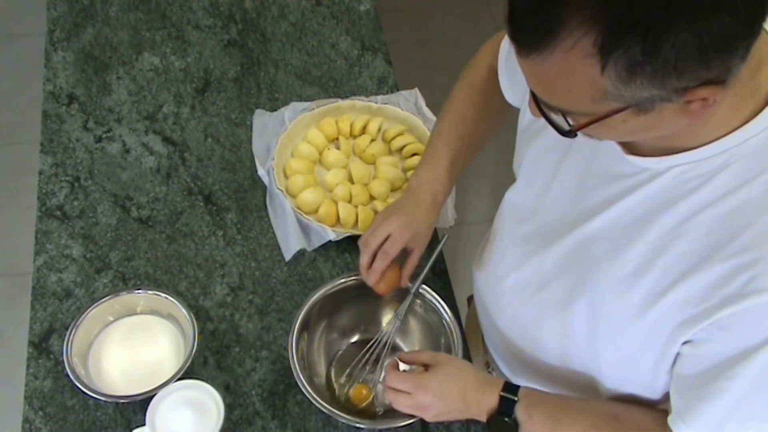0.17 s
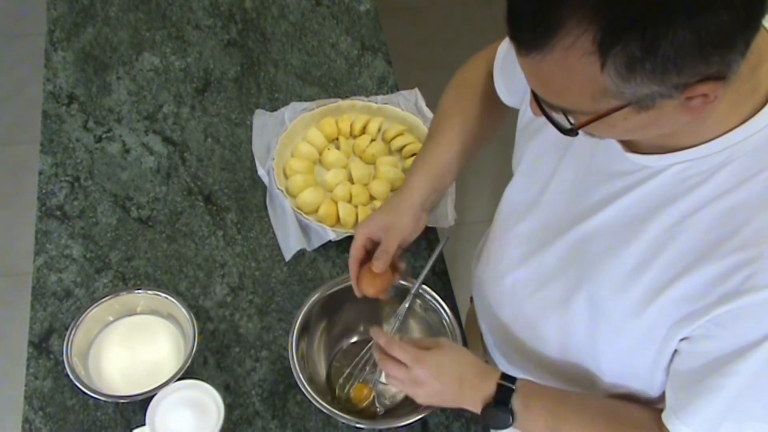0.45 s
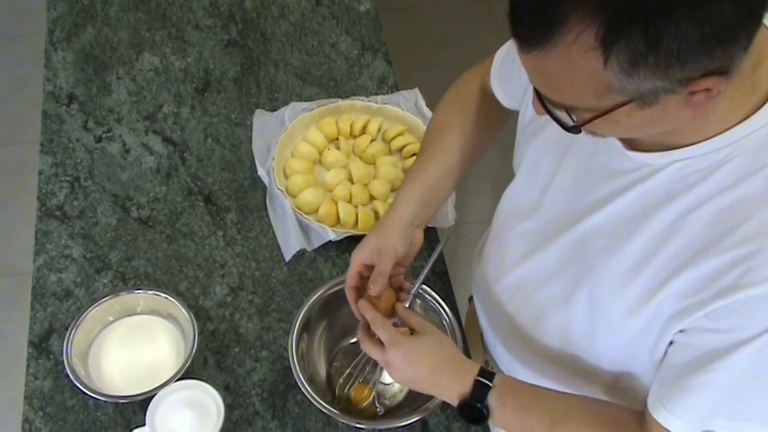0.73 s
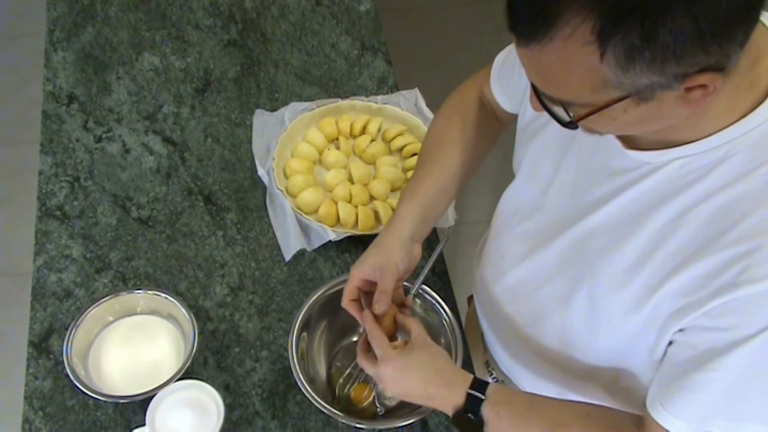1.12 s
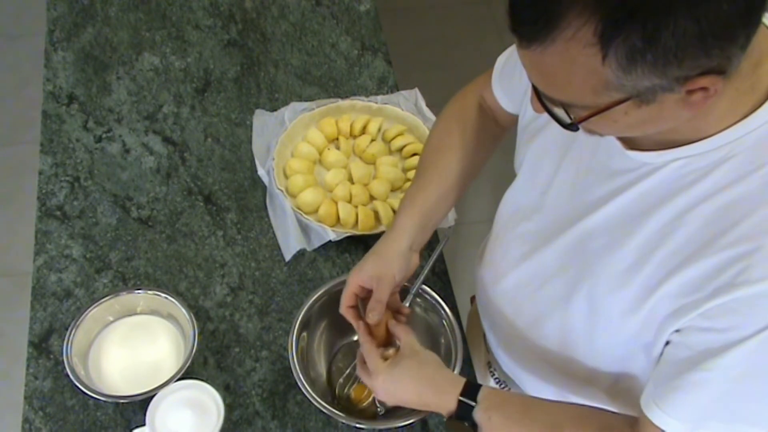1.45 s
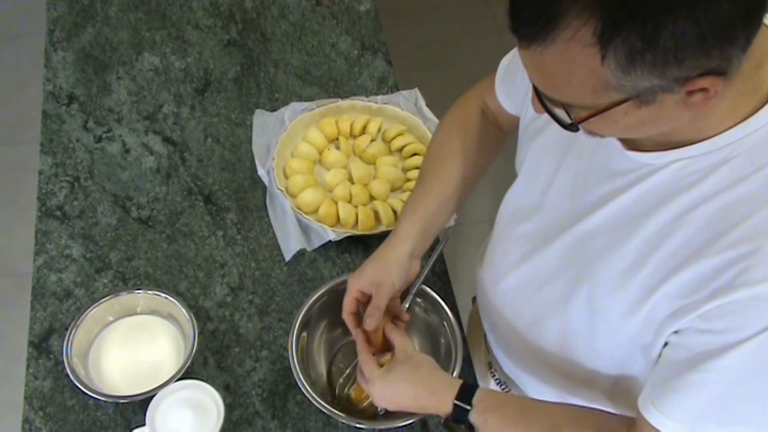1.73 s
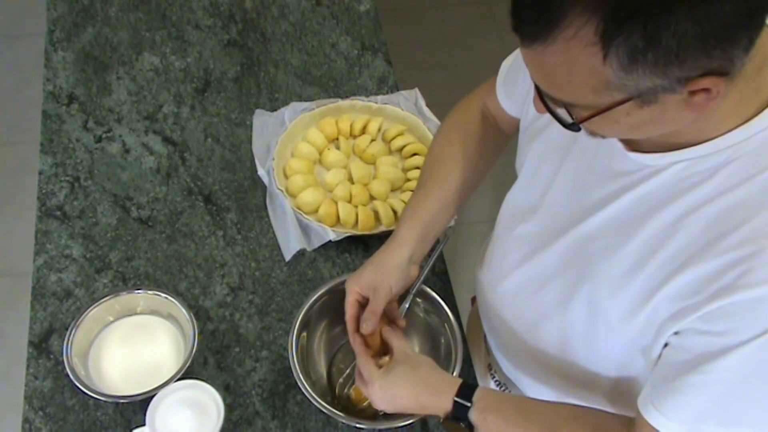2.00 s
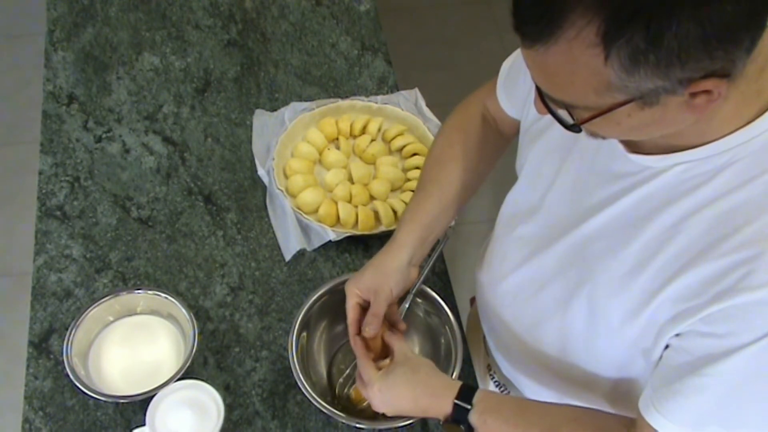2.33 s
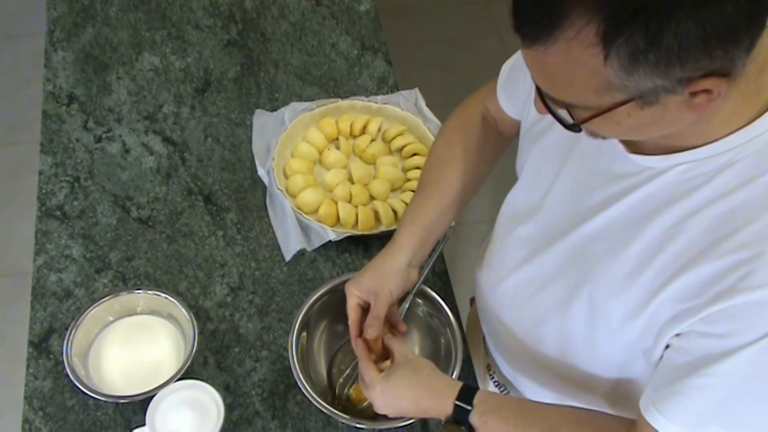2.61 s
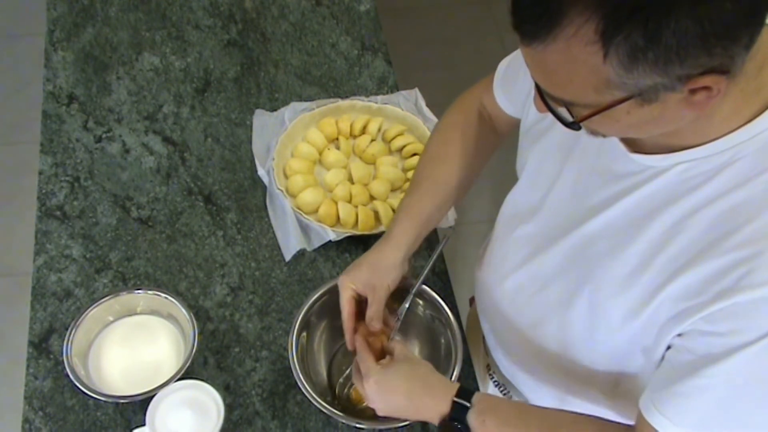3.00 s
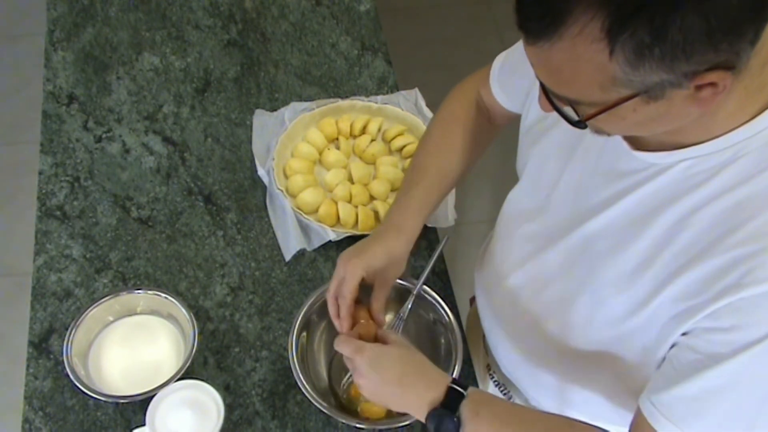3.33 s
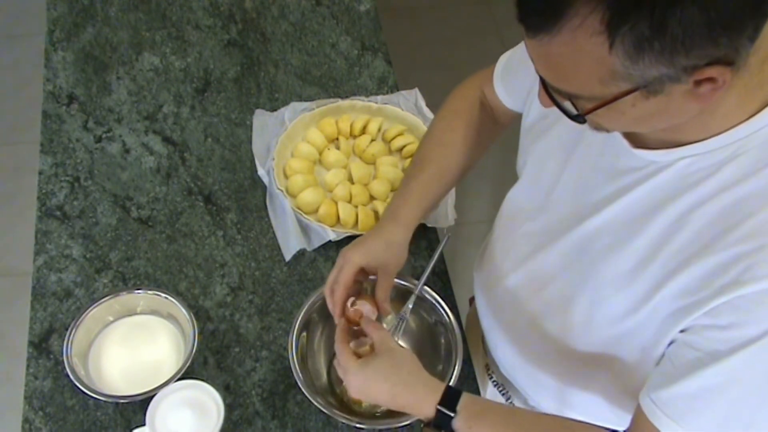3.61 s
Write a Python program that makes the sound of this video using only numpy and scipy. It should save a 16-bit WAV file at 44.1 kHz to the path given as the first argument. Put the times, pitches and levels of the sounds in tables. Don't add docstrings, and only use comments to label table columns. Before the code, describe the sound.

An egg knocks on a steel bowl rim, ringing, then its shell crackles open by hand.

```python
import sys
import numpy as np
from scipy import signal
from scipy.fft import rfft, irfft, next_fast_len
from scipy.io import wavfile

SR = 44100
rng = np.random.default_rng(int(sys.argv[2]) if len(sys.argv) > 2 else 0)


def wav_out(sig):
    wavfile.write(sys.argv[1], SR, np.round(np.clip(np.atleast_2d(sig).T, -1, 1) * 32767).astype(np.int16))


def voltage_ratio(level):
    return 10 ** (np.asarray(level, float) / 20)


N = 165375
LEAD = 22050
M = N + LEAD
SCENE_S = (np.arange(M) - LEAD) / SR
DECAY_S = np.arange(SR + SR // 2) / SR


def at_hz(points, hz, column=1):
    points = np.array(points)
    return np.interp(np.log(hz), np.log(points[:, 0]), points[:, column])


def rms_one(x):
    return x / np.sqrt(np.mean(x ** 2) + 1e-20)


def add(out, s, piece):
    i = int(s * SR) + LEAD
    out[i:i + len(piece)] += piece[:M - i]


def ring(clicks, hz, t60):
    r = voltage_ratio(-60 / (t60 * SR))
    w = 2 * np.pi * hz / SR
    return signal.lfilter([0, np.sin(w)], [1, -2 * r * np.cos(w), r * r], clicks + 1e-18)


def body(x, peaks):
    return sum(voltage_ratio(db) * ring(x, hz, 3.8 / width) * np.sqrt(width / 1000) for hz, width, db in peaks)


def bands(size, shape, likeness):
    out = 0
    edges = 25 * 2 ** np.arange(0, 9.6, .5)
    white = rng.standard_normal((2, 2, size))
    for k, (low, high) in enumerate(zip(edges, edges[1:])):
        band = signal.butter(2, [low, high], "band", fs=SR, output="sos")
        mid, side = signal.sosfilt(band, white[k % 2])
        hz = np.sqrt(low * high)
        alike = np.clip(at_hz(likeness, hz), 0, 1)
        stereo = np.sqrt(1 + alike) * mid + np.sqrt(1 - alike) * side * [[1], [-1]]
        out = out + shape(hz) * stereo
    return out


def wobble(t):
    depth_db, wobbles_per_s = 2, 26
    knots = np.arange(40) / wobbles_per_s
    return voltage_ratio(depth_db * np.interp(t, knots, rng.standard_normal(len(knots))))


# [f/Hz, level at first knock/dB, level at second knock/dB, t60/s]
STEEL_MODES = [(610.4, -11, -10, 0.9), (661, -7, -12, 1.1), (685, -30, -11.5, 1.4), (763.3, -4, -6.5, 1.33),
               (1057.6, -4, -11, 1.65), (1355, -25, -13, 1.1), (1877, -29, -3.5, 0.55),
               (1913, -36, -4.5, 0.73), (1974, -47, -4.5, 1.48), (2502, -16, -4, 0.8),
               (2600, -34, -17.5, 2.1), (3006, -17, -10.5, 1.12), (3530, -27, -17.5, 0.96),
               (4830, -42, -18, 0.55),
               (123.3, -19, -11, 0.86), (480, -1, -12, 0.74), (4393, -41, -12, .5), (5830, -40, -20, 0.54),
               (5900, -38, -5, 0.52), (7300, -36, -6, .5), (2530, -21, -12.5, 2)]


def steel_ring(hit, k, level_db):
    swell_s = 0.023
    modes = 0
    for mode in STEEL_MODES:
        modes = modes + voltage_ratio(level_db + mode[1 + k]) * ring(hit, mode[0], mode[-1]) * wobble(DECAY_S)
    return modes * (1 - np.exp(-DECAY_S / swell_s))


def shell_thud(hit, level_db):
    return voltage_ratio(level_db) * ring(hit, hz=1270, t60=.04)


# [f/Hz, width/Hz, level/dB]
SIZZLE_PEAKS = [(7300, 910, -9), (6580, 2800, -8.5), (9500, 1300, -30), (2740, 2300, -10)]


def whisk_sizzle(level_db):
    t60_s = 0.15
    noise = rng.standard_normal(len(DECAY_S)) * voltage_ratio(-60 * DECAY_S / t60_s)
    return voltage_ratio(level_db - 16.5) * body(noise, SIZZLE_PEAKS)


# [f/Hz, width/Hz, level/dB]
COUNTER_PEAKS = [(138.5, 43, 5), (286, 100, -39), (724, 590, 10.5), (1300, 2100, 10), (1830, 440, 10)]


def counter_thump(level_db):
    bloom_s, t60_s = 0.052, 0.14
    bloom = 1 - np.exp(-(DECAY_S / bloom_s) ** 2)
    noise = rng.standard_normal(len(DECAY_S)) * bloom * voltage_ratio(-60 * DECAY_S / t60_s)
    return voltage_ratio(level_db - 15.5) * body(noise, COUNTER_PEAKS)


# [t/s, bowl level/dB, shell thud level/dB, whisk sizzle level/dB, counter thump level/dB]
KNOCK_EVENTS = [
    (-.2, -23, -14.5, -11.5, -13),
    (0.1153, -20.5, -5, -2, -6.5),
]


def knocks():
    blows, bowl, thud = np.zeros(M), np.zeros(M), np.zeros(M)
    hit = (DECAY_S == 0) * 1.
    for k, (s, bowl_db, thud_db, sizzle_db, thump_db) in enumerate(KNOCK_EVENTS):
        add(bowl, s, steel_ring(hit, k, bowl_db))
        add(thud, s, shell_thud(hit, thud_db))
        add(blows, s, whisk_sizzle(sizzle_db) + counter_thump(thump_db))
    hand_db = np.interp(SCENE_S, [.58, .58 + 0.0064], [0, -7])
    return blows, bowl * voltage_ratio(hand_db), thud


# [f/Hz, level/dB per Hz]
HISS_COLOUR = [(410, -18), (700, -22), (1280, -2.5), (1620, -12.5), (2190, -8), (9000, -20.5), (16000, -22)]
# [f/Hz, level/dB per Hz]
HUM_COLOUR = [(15, -42), (25, -21.5), (102, 4), (124, -4.5), (192, 1), (267, -11), (292, -1.5), (479, -1),
              (900, -5.5), (1170, -44), (1980, -120)]
# [f/Hz, likeness/0-1]
TONE_LIKENESS = [(60, .99), (200, .85), (1000, .22), (3000, .5), (8000, .6), (15000, .85)]


def room_tone():
    tone, pan_db = 0, -0.14
    for colour, level_db in ((HISS_COLOUR, -58.5), (HUM_COLOUR, -59.5)):
        noise = bands(M, lambda hz: voltage_ratio(at_hz(colour, hz)), TONE_LIKENESS)[:, LEAD:]
        tone = tone + voltage_ratio(level_db) * rms_one(noise)
    return tone * voltage_ratio(pan_db * np.array([[1], [-1]]))


# [t/s, level/dB]
FINGER_PRESSURE = [(0, -65), (1.2, -63.5), (2.1, -70.5), (2.55, -68), (2.62, -56), (2.76, -60),
                   (2.819, -52.5), (3.1, -61.5), (3.28, -56), (3.4, -58.5), (3.52, -53.5), (3.58, -58),
                   (3.75, -57)]


def grit():
    grits_per_s = 1200
    s, db = np.transpose(FINGER_PRESSURE)
    strength = voltage_ratio(3.5 * np.minimum(rng.exponential(1, M), 3))
    clicks = (rng.random(M) < grits_per_s / SR) * strength * rng.choice([-1, 1], M)
    dealt = rng.integers(0, 10, M)
    crackle = 0
    for k, hz in enumerate(np.geomspace(1800, 9000, 10)):
        crackle = crackle + ring(clicks * (dealt == k), hz, 10 / hz) * (hz / 2000) ** 0.24
    return voltage_ratio(np.interp(SCENE_S, s, db)) * rms_one(crackle)


def cracks(rows, gain_db, cycles, wide_db, low_hz, high_hz):
    clicks_per_s, rise_s, first_click = 4000, .0006, .75
    spread = 0.053
    tick_span = 1.6
    out, size = np.zeros(M), 2048
    t = np.arange(size) / SR
    draws = rng.random((len(rows), 3, size))
    for (s, db, hz, length), (when, big, side) in zip(rows, draws):
        run = (when < clicks_per_s / SR) * big * (1 - np.exp(-t / rise_s))
        clicks = (run + first_click * (t == 0)) * np.sign(side - .5) * np.exp(-(t / length) ** 2)
        tones = 0
        for k in (-1, 0, 1):
            uneven = clicks * (.5 + np.roll(big, k + 2))
            tones = tones + ring(uneven, hz * (1 + spread * k), cycles / hz) * voltage_ratio(-6 * abs(k))
        top_hz = np.clip(tick_span * hz, 1.5 * low_hz, high_hz)
        wide = signal.butter(2, [low_hz, top_hz], "band", fs=SR, output="sos")
        steep = signal.butter(4, min(hz, low_hz * 1.2) * 0.75, "high", fs=SR, output="sos")
        tick = voltage_ratio(wide_db) * 4 * signal.sosfilt(wide, clicks)
        piece = signal.sosfilt(steep, tones + tick)
        add(out, s, voltage_ratio(db + gain_db) * piece / np.abs(piece).max())
    return out


# [t/s, peak level/dB, f/Hz, length/s]
CRUNCH_EVENTS = [(0.833, -29, 2340, 0.0038), (0.93, -33.5, 1880, 0.019), (1.0165, -31, 1597, 0.031),
                 (1.372, -41, 2210, 0.0061), (1.486, -33.5, 1300, 0.013), (1.6036, -41.5, 1420, 0.0058),
                 (1.8943, -37, 2200, 0.003), (2.13, -43.5, 1300, 0.0037), (2.1465, -30.5, 2520, 0.01),
                 (2.238, -46, 2250, 0.0038), (2.291, -34, 2020, 0.0091), (2.302, -23, 2120, 0.0043),
                 (2.312, -30, 2290, 0.004), (2.317, -30.5, 2670, 0.0024), (2.331, -29, 2070, 0.0047),
                 (2.345, -36, 2180, .004), (2.3656, -38.5, 1310, 0.0072), (2.3797, -32.5, 2100, 0.0067),
                 (2.4, -33, 2120, 0.005), (2.5034, -45, 2100, 0.0036), (2.5608, -38.5, 1840, 0.021),
                 (2.583, -32, 2160, 0.0037), (2.605, -24, 2160, 0.0065), (2.622, -28.5, 2210, 0.009),
                 (2.6665, -33, 2150, 0.0054), (2.788, -26.5, 2020, 0.0077), (2.798, -19, 2210, 0.0039),
                 (2.813, -20.5, 2230, 0.0052), (2.834, -36, 2200, .005), (2.943, -34, 2190, 0.0032),
                 (2.9557, -21.5, 2230, 0.0031), (3.001, -51, 2100, 0.003), (3.016, -29.5, 2090, 0.0015),
                 (3.032, -48, 2080, 0.0022),
                 (3.127, -45, 1800, 0.0045),
    (3.1607, -45, 2120, 0.0069),
    (3.2564, -33, 2270, 0.0094),
    (3.285, -41, 3400, 0.0055),
    (3.312, -37, 2100, 0.0059),
    (3.341, -32.5, 2000, 0.0062),
    (3.4259, -31, 2150, 0.0094),
    (3.4294, -30.5, 2180, 0.0066),
    (3.4725, -26, 2470, 0.0036),
    (3.598, -35, 2030, 0.0038),
]
# [t/s, peak level/dB, f/Hz, length/s]
TAP_EVENTS = [
    (.1153, -8, 1300, 0.0031),
    (1.487, -31, 2100, 0.0065),
    (1.487, -31.5, 2810, 0.0076),
    (3.3, -20, 3200, 0.0027),
    (2.304, -30, 2820, 0.0073),
    (2.8, -40, 1440, 0.0057),
    (2.606, -36, 1200, 0.0033),
]


def crunches():
    rows = CRUNCH_EVENTS + TAP_EVENTS
    return cracks(rows, gain_db=-3.5, cycles=29, wide_db=-52, low_hz=1600, high_hz=3500)


# [t/s, peak level/dB, f/Hz, length/s]
SNAP_EVENTS = [(.1153, -13, 6100, 0.0014), (0.82, -46, 5000, 0.0068), (0.928, -54, 5950, 0.004),
               (1.02, -43, 6000, 0.0052), (1.276, -44, 5000, 0.014), (1.487, -36, 6530, 0.0047),
               (1.6475, -34, 6700, 0.0026), (1.74, -44.5, 5540, 0.016), (1.965, -48.5, 5450, 0.014),
               (2.131, -30, 8100, 0.0035), (2.147, -26, 5340, 0.0019), (2.424, -45, 6760, 0.006),
               (2.434, -45, 7300, 0.0056), (2.5835, -26, 7840, 0.0017), (2.6045, -21, 8700, 0.003),
               (2.665, -33, 6000, 0.0041), (2.798, -24, 6630, 0.0028), (2.812, -32.5, 6300, 0.0089),
               (2.924, -34, 6460, 0.01), (2.9555, -19, 8890, 0.0012), (3.016, -31.5, 6630, 0.0026),
               (3.132, -37.5, 5640, 0.0045), (3.137, -35.5, 5000, 0.0052), (3.16, -33, 8000, 0.0068),
               (3.2357, -33, 7300, 0.0045), (3.251, -25.5, 7300, 0.0034), (3.26, -25.5, 7060, 0.007),
               (3.273, -29, 4460, 0.0097), (3.3404, -33, 3940, 0.006), (3.345, -28.5, 6940, 0.005),
               (3.4217, -26.5, 4380, 0.0073), (3.4312, -23.5, 3540, 0.0017), (3.465, -22.5, 8400, 0.0043),
               (3.4737, -28, 6200, 0.0043), (3.598, -19.5, 9200, 0.0023)]


def snaps():
    return cracks(SNAP_EVENTS, gain_db=1.5, cycles=12.6, wide_db=3, low_hz=2260, high_hz=11400)


# [t/s, peak level/dB, f/Hz, length/s]
PING_EVENTS = [
    (.597, -43.5, 5000, .002),
    (.928, -41.5, 6060, 0.0017),
    (1.022, -42, 5900, 0.0029),
    (2.434, -48.5, 7300, 0.0032),
    (3.137, -32, 7840, 0.004),
    (3.15, -36, 7880, 0.0037),
    (3.602, -32, 5920, 0.0023),
]


def chip_pings():
    return cracks(PING_EVENTS, gain_db=1.5, cycles=90, wide_db=-24, low_hz=2420, high_hz=12000)


# [t/s, peak level/dB, f/Hz, length/s]
THUMP_EVENTS = [
    (2.147, -40.5, 480, 0.0035),
    (2.606, -39, 428, 0.004),
    (2.668, -44, 520, 0.0023),
    (2.956, -52, 360, 0.0023),
    (3.137, -40, 610, .003),
]


def bowl_thumps():
    return cracks(THUMP_EVENTS, gain_db=-7, cycles=2.8, wide_db=-52, low_hz=302, high_hz=900)


# [delay t/s, level/dB, smear/s]
EARLY_ECHOES = [(.0043, -1, .0002), (.015, -9, .006), (.031, -12, .008)]


def early_echoes():
    t = DECAY_S[:SR // 10]
    soften = signal.butter(1, 16300, fs=SR)
    grain = signal.lfilter(*soften, rng.standard_normal(len(DECAY_S)))[:len(t)]
    early = (t == 0) * 1.
    for s, db, smear in EARLY_ECHOES:
        echo = grain * (t >= s) * np.exp(-np.abs(t - s) / smear)
        early += voltage_ratio(db) * echo / np.sqrt(np.sum(echo ** 2))
    return early


# [f/Hz, t60/s, level/dB]
KITCHEN_DECAY = [(78.5, 0.98, -2.5), (242, 1.21, -2.5), (720, 1.026, 7), (2160, 1.13, 0.5),
                 (5000, 1.003, 1), (8760, 0.47, 8), (14900, 0.53, -1.5)]
# [f/Hz, likeness/0-1]
TAIL_LIKENESS = [(60, 0.9), (400, 0.68), (1500, 0.63), (5000, 0.78), (14000, 1)]


def diffuse_tail():
    room_db, rise_s = -1, .022

    def decay(hz):
        return voltage_ratio(at_hz(KITCHEN_DECAY, hz, column=2) - 60 * DECAY_S / at_hz(KITCHEN_DECAY, hz))

    tail = bands(len(DECAY_S), decay, TAIL_LIKENESS) * (1 - np.exp(-DECAY_S / rise_s))
    return voltage_ratio(room_db) * tail / np.sqrt(np.sum(tail ** 2) / 2)


def kitchen(x, small):
    small_wet_db = -2.5
    sent = x + voltage_ratio(small_wet_db) * small
    wet = signal.fftconvolve(sent[None], diffuse_tail(), axes=1)[:, LEAD:M]
    return wet + signal.fftconvolve(x + small, early_echoes())[LEAD:M]


# [f/Hz, left minus right level/dB]
PORT_TILT = [(60, 13), (190, 13), (350, 8), (700, 3), (1400, -1), (2800, -2.2), (11000, -.3)]


def ports(x):
    size = next_fast_len(N + 4096)
    hz = np.maximum(np.fft.rfftfreq(size, 1 / SR), 1)
    tilt_db = at_hz(PORT_TILT, hz) / 2
    return irfft(rfft(x, size) * voltage_ratio(tilt_db * [[1], [-1]]), size)[:, :N]


def scene():
    bowl_wet_db, thud_wet_db, thud_dry_db = -12, -4.5, -1
    blows, bowl, thud = knocks()
    tone = room_tone()
    shell = grit() + crunches() + snaps() + chip_pings() + bowl_thumps()
    struck = blows + voltage_ratio(bowl_wet_db) * bowl + voltage_ratio(thud_wet_db) * thud
    unechoed = (bowl + voltage_ratio(thud_dry_db) * thud)[LEAD:]
    close = kitchen(struck, shell) + unechoed
    mic = signal.butter(3, [128, 13400], "band", fs=SR, output="sos")
    return ports(signal.sosfilt(mic, close)) + tone


def low_pass(x):
    return signal.sosfilt(signal.butter(12, 16510, fs=SR, output="sos"), x)


def record(dry):
    limit_db, release_db_per_s, attack_s = -7, 217, 0.00044
    slope = release_db_per_s * np.arange(N) / SR
    peak_db = 20 * np.log10(np.abs(dry).max(axis=0) + 1e-9)
    over = np.maximum(peak_db - limit_db, 0)
    cut_db = np.maximum.accumulate(over + slope) - slope
    r = np.exp(-1 / (attack_s * SR))
    cut_db = signal.lfilter([1 - r], [1, -r], np.roll(cut_db, -64))
    top = signal.cheby2(12, 50, 16400, fs=SR, output="sos")
    return low_pass(signal.sosfilt(top, dry * voltage_ratio(-cut_db)))


dry = scene()
out = record(dry)
wav_out(out)
```